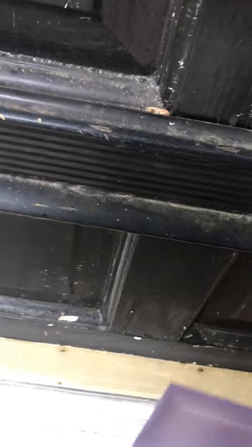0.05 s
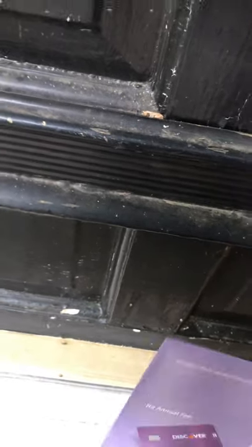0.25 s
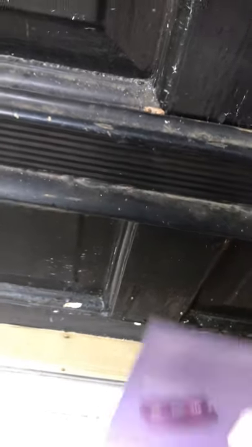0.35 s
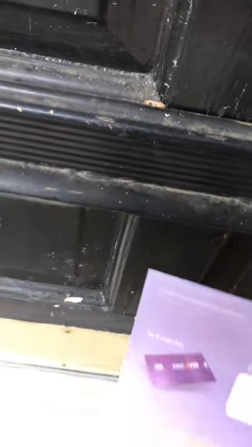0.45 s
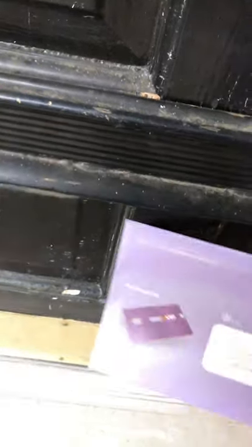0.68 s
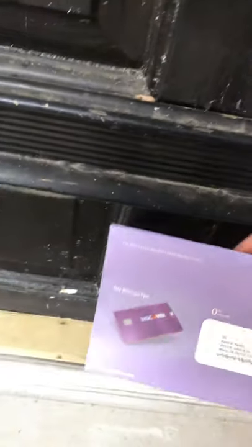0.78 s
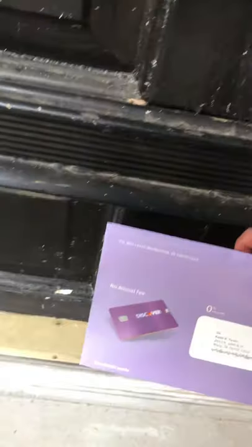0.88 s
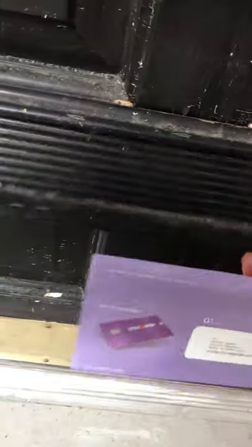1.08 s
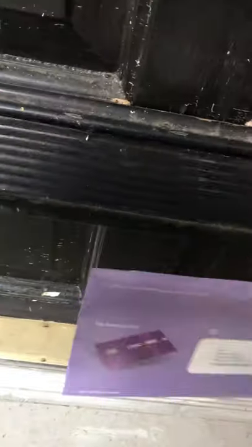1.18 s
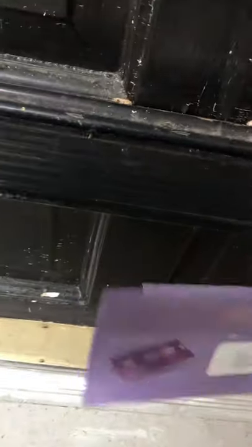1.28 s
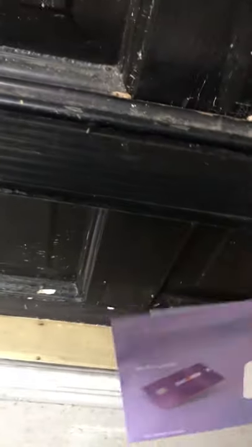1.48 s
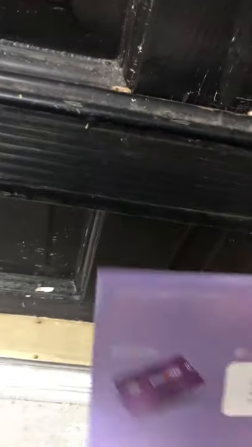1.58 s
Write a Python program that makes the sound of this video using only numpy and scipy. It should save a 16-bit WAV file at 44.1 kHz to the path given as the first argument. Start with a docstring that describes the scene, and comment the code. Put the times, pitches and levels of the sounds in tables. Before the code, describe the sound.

A small dog yaps three times behind a wooden front door, whines briefly and barks once more, softly. Close by on the porch, an envelope scrapes and the metal letter flap rattles over a low, distant hum.

```python
"""A small dog yaps in the hall behind a wooden front door, heard from the porch, microphone by the slot.
Three barks with a grumble before the third, a short whine, then a softer fourth bark: the voice comes
muffled through the door, its thin overtones through the letter slot. Close up, an envelope scrapes,
ticks and bumps the wood, and on the last bark the metal flap rattles and knocks the door panel.
Farther off, a low hum like an idling engine goes on throughout."""
import sys
import numpy as np
from scipy import signal
from scipy.fft import rfft, irfft, next_fast_len
from scipy.io import wavfile
from scipy.ndimage import map_coordinates

SR = 44100
rng = np.random.default_rng(int(sys.argv[2]) if len(sys.argv) > 2 else 0)


def materialize(psi):
    """Save the field psi as 16-bit PCM at rate SR to the path in sys.argv[1].

    A 1-D psi becomes a single channel; in a 2-D psi each row is a channel.
    """
    bounded = np.clip(np.atleast_2d(psi).T, -1, 1)
    quanta = np.round(bounded * 32767).astype(np.int16)
    wavfile.write(sys.argv[1], SR, quanta)


N = 72765

# swell of the hum in the street (time [s], level [dB])
HUM_LEVEL = [(0, -29), (.27, -28), (.55, -32.5), (.85, -30.5), (1.05, -31), (1.28, -27), (1.45, -30.5),
             (1.65, -29.5)]
# tones of the hum (frequency at mid-scene [Hz], level [dB])
HUM_LINES = [(63.9, -2), (102, -9), (127.5, -17), (140.3, -7), (204, -26), (280, -26)]
# outdoor air (frequency [Hz], level [dB])
AIR_TONE = [(20, -35), (45, 4), (90, 14), (160, 5.5), (230, 0), (400, -10), (700, -14.5), (1100, -13),
            (1600, -23), (4000, -34), (8000, -44.5), (15500, -42.5)]

# the dog's six calls, each (time [s], pitch [Hz], level [dB])
BARK_1 = [(0.266, 379.5, -25), (0.274, 400, -17), (0.292, 495, -9.5), (0.302, 570, -11), (0.311, 650, -16),
          (0.317, 675, -6), (0.326, 686, -7), (0.336, 658, -7), (0.358, 597, -11.5), (0.378, 545, -15),
          (0.402, 505, -16), (0.414, 506, -21), (0.43, 482, -24)]
BARK_2 = [(0.464, 400, -23), (0.482, 500, -21), (0.49, 535, -18), (0.5, 510, -16.5), (0.512, 535, -14.5),
          (0.543, 583, -16.5), (0.562, 543, -14), (0.573, 490, -15), (0.581, 435, -11.5), (0.597, 398, -11),
          (0.612, 360, -21), (0.625, 310, -30)]
GRUMBLE = [(.68, 354, -48), (.705, 449.6, -28.5), (.73, 518, -26.5), (.75, 515, -27.5)]
BARK_3 = [(0.768, 387.6, -21), (0.782, 407, -13), (0.798, 504.3, -20.5), (0.816, 559.4, -19.5),
          (0.82, 570.2, -15), (0.83, 539.4, -18.5), (0.836, 514.6, -17.5), (0.85, 377.3, -10.5),
          (0.86, 362.7, -22), (0.87, 355.3, -15.5), (0.893, 324.5, -23.5)]
WHINE = [(1.072, 505, -41), (1.095, 490, -27.5), (1.113, 485, -32.5), (1.14, 482, -28.5), (1.165, 435, -34),
         (1.2, 410, -43)]
BARK_4 = [(1.264, 311.6, -35.5), (1.273, 375.8, -23), (1.283, 446.5, -22.5), (1.297, 469.8, -21),
          (1.315, 538, -23.5), (1.34, 527.4, -26)]
# throat colour: mouth open, half closed, in a whine, in a soft bark (frequency [Hz], level [dB])
YAP = [(300, -20), (430, -15), (580, 4), (800, 0), (1050, -1), (1350, -7), (1480, -24.5), (2200, -38),
       (4000, -65)]
WOOF = [(300, -19.5), (540, -38), (690, 2), (900, -1.5), (1200, 4.5), (1350, -3), (1520, -13),
        (1850, -15.5), (2290, -14), (2600, -26), (3400, -29.5), (7000, -52)]
WHIMPER = [(280, -25), (410, 3), (480, 4), (600, -6), (920, -22), (1450, -13), (2000, -32), (9000, -65)]
SOFT_WOOF = [(300, -9), (540, -14.5), (700, 6), (900, -3), (1200, 0.5), (1520, -11), (2600, -20),
             (7000, -45)]
# voicing of each call (call table, throat colour, fundamental [dB], rasp [dB])
CALLS = [(BARK_1, YAP, -19, -6.5), (BARK_2, YAP, -8.5, -5), (GRUMBLE, YAP, -35.5, -1.1),
         (BARK_3, WOOF, -51, -2.4), (WHINE, WHIMPER, 0, 2.5), (BARK_4, SOFT_WOOF, -23, 0)]
# hoarseness of the voice (time [s], roughness [0 clear to 1 hoarse])
ROUGHNESS = [(.27, .55), (.29, .28), (.32, .1), (.337, .42), (.41, .4), (.47, .22), (.555, .06), (.58, .2),
             (.62, .25), (.68, .55), (.75, .55), (.78, .15), (.815, .65), (.84, .55), (.855, .12),
             (.91, .3), (1.09, .06), (1.2, .14), (1.27, .12), (1.3, .5)]
# thin overtones leaking through the slot (time [s], level [dB])
SQUEAK_LEVEL = [(.265, -63.5), (.297, -40.5), (.335, -36.5), (.395, -40.5), (.415, -69.5), (.48, -54.5),
                (.51, -39), (.565, -40), (.59, -41), (.607, -65), (.78, -65.5), (.835, -46.5), (.86, -68)]
# their broad colour (frequency [Hz], level [dB])
SQUEAK_TONE = [(1060, -32), (1800, 0.5), (2060, -14.5), (2380, 0.5), (2850, -10), (3230, -5.5),
               (3670, -7.5), (4470, -9), (5860, -8), (7270, -12.5), (10300, -19.5), (14000, -14.5),
               (15500, -25.5)]
# resonances of the slot (frequency [Hz], width [Hz], gain [dB])
SLOT_RESONANCES = [(3270, 130, 6), (4450, 260, 1), (5350, 170, 1), (7200, 400, 4)]
# chesty puff opening the first bark (time [s], level [dB], rise [s], t60 [s])
CHEST_PUFF = (.26, -27, .003, .07)
# colour of that puff (frequency [Hz], level [dB])
CHEST_TONE = [(280, -30), (400, 24.5), (750, -18), (1200, -33), (1600, -41), (4000, -65)]
# narrow resonance of the hall (frequency [Hz], width [Hz], gain [dB])
HALL_RESONANCE = (2295, 47, 14)
# reverberation behind the door (frequency [Hz], t60 [s])
HALL_DECAY = [(200, 0.34), (1100, 0.44), (2300, 0.12), (8000, 0.28)]

# envelope sliding, close to the microphone (time [s], level [dB])
SLIDE_LEVEL = [(0, -91), (.55, -64), (.68, -46), (.9, -45), (1.1, -53), (1.38, -43), (1.46, -63.5),
               (1.65, -54.5)]
# paper strokes (time [s], level [dB], rise [s], t60 [s])
STROKES = [(0.948, -42, 0.0028, 0.15), (.975, -55, 0.0032, 0.17), (1.062, -28, 0.026, 0.18),
           (1.156, -46, .002, 0.094), (1.228, -35, 0.021, 0.17), (1.32, -62, 0.011, 0.43),
           (1.504, -49.5, 0.0043, 0.2), (1.631, -42, 0.0078, 0.24)]
# colour of the scraping paper (frequency [Hz], level [dB])
PAPER_TONE = [(300, 10.5), (1500, -4), (2800, -6), (4000, -10), (5500, -8), (7500, -16), (10000, -19.5),
              (15000, -29.5)]
# sharp ticks of the envelope's edge (time [s], level [dB])
TICKS = [(.899, -43.5), (.945, -38), (.974, -49), (0.9792, -44), (0.9902, -41), (0.997, -33), (1.1967, -35)]
# colour of the ticks (frequency [Hz], level [dB])
TICK_TONE = [(500, -8), (1500, -6), (2800, 0), (5800, 0), (7500, -12), (11000, -22), (15000, -32)]
# envelope bumping the door (time [s], level [dB])
BUMPS = [(0.998, -38), (1.159, -32), (1.197, -27), (1.608, -30)]
# colour of the bumps (frequency [Hz], level [dB])
BUMP_TONE = [(80, -5), (280, -1.5), (650, 2), (1500, -10.5), (3000, -12), (8000, -65)]

# contacts of the flap (time [s], level [dB], door thud [dB])
FLAP_CONTACTS = [(1.278, -30, -43), (1.286, -14.5, -23), (1.2898, -20, -40), (1.2956, -13, -30),
                 (1.299, -22, -40), (1.3018, -12, -23), (1.3072, -19, -25), (1.3113, -6.5, -28),
                 (1.6036, -24.5, -46)]
# modes of the metal flap (frequency [Hz], level [dB])
FLAP_MODES = [(2860, -7.5), (5200, -9.5), (5920, -7), (6950, 0), (8700, -9.5)]
# colour of each contact's crack (frequency [Hz], level [dB])
CRACK_TONE = [(300, -0.5), (1200, 3.5), (2800, -3), (4500, -9.5), (6000, -8.5), (7100, -2.5), (7800, -11),
              (8700, -2), (9700, -8), (10500, -20.5), (15500, -27)]
# modes of the door panel (frequency [Hz], level [dB], t60 [s])
PANEL_MODES = [(137, -6, .09), (203, 0, .12), (240, -8, .07), (480, -10, .05), (703, -1, .11),
               (1060, -8, .12)]
# reverberation around the microphone (frequency [Hz], t60 [s])
PORCH_DECAY = [(200, 0.47), (2000, 0.97), (10000, 0.13)]

HUM_DRIFT_PER_S, HUM_WAVER_DB, AIR_DB = 0.0276, 0.8, -39
JITTER, JITTER_HZ, WANDER, WANDER_HZ = 0.04, 201.65, 0.06, 90  # depths: share of pitch at roughness 1
FLUTTER_HZ, CALL_EDGE_S = 196.8, 0.012
OPEN_HZ, OPEN_DB_PER_OCT = 563, 15  # the fundamental fades as the pitch falls below OPEN_HZ
THIRD_HARMONIC_DB, SUBHARMONIC_DB = -24, -5
SQUEAK_HISS_SHARE, SQUEAK_SCATTER, FLICKER_DB, FLICKER_HZ = 0.4, 0.27, 2.5, 130
GRAIN_DB, GRAIN_HZ = 0.5, 487
RING_DB, RING_SCATTER, CRACK_DB = -10.5, 0.017, -9
VOICE_HALL_DB, SQUEAK_HALL_DB, PORCH_DB = -8.5, -7.5, -17.5
TOP_HZ = 15750


def amp(db):
    """Decibels to gain."""
    return 10 ** (np.asarray(db) / 20)


def unit(x):
    """Scale to rms 1."""
    return x / np.sqrt(np.mean(x ** 2) + 1e-20)


def along(points, hz):
    """Interpolate (frequency [Hz], value) points on a log axis."""
    freqs, values = np.transpose(points)
    return np.interp(np.log(hz + 1), np.log(freqs + 1), values)


def clock():
    """Time of each sample in seconds."""
    return np.arange(N) / SR


def curves(rows):
    """One value per sample for each column after the time."""
    times, *columns = np.transpose(rows)
    return [np.interp(clock(), times, column) for column in columns]


def wobble(hz):
    """A smooth random curve with hz knots a second."""
    return map_coordinates(rng.standard_normal(N // 8), [clock() * hz], mode="wrap")


def filtered(x, response):
    """x through a gain given as a function of frequency."""
    size = next_fast_len(N + SR // 2)
    return irfft(rfft(x, size) * response(np.fft.rfftfreq(size, 1 / SR)), size)[:N]


def coloured(x, spectrum):
    """x through a colour (frequency [Hz], level [dB])."""
    return filtered(x, lambda hz: amp(along(spectrum, hz)))


def resonant(x, peaks):
    """x with resonances added."""
    def response(hz):
        return 1 + sum(2j * amp(db) * hz * width / (centre ** 2 - hz ** 2 + 1j * hz * width)
                       for centre, width, db in peaks)
    return filtered(x, response)


def noise(spectrum):
    """Coloured noise of rms 1."""
    return unit(coloured(rng.standard_normal(N), spectrum))


def burst(start, rise, t60):
    """A rise and an exponential decay, times in seconds."""
    age = np.maximum(clock() - start, 0)
    return (1 - np.exp(-age / rise)) * np.exp(-np.log(1000) * age / t60)


def ring(start, hz, t60):
    """One struck mode."""
    return burst(start, 0.00033, t60) * np.sin(2 * np.pi * hz * (clock() - start))


def echo(x, decay):
    """A diffuse tail in which each frequency dies at its own speed."""
    hz, t, bands = signal.stft(rng.standard_normal(SR // 2), SR, nperseg=256)
    fade = np.exp(-np.log(1000) * t / along(decay, hz)[:, None])
    _, tail = signal.istft(bands * fade, SR, nperseg=256)
    return signal.fftconvolve(x, tail / np.linalg.norm(tail))[:N]


def street():
    """Beyond the porch: a low idling hum wavers and slowly speeds up over outdoor air."""
    level_db, = curves(HUM_LEVEL)
    speed = 1 + HUM_DRIFT_PER_S * (clock() - clock().mean())
    turn = 2 * np.pi * np.cumsum(speed) / SR
    hum = sum(amp(db + HUM_WAVER_DB * wobble(hz=6.15)) * np.sin(hz * turn + rng.uniform(0, 2 * np.pi))
              for hz, db in HUM_LINES)
    return np.sqrt(2) * amp(level_db) * hum + amp(AIR_DB) * noise(AIR_TONE)


def voice_partial(order, phase, rough):
    """One partial of the dog's voice; its level flutters more as the voice gets hoarse."""
    wave = np.sqrt(2) * np.sin(order * phase + rng.uniform(0, 2 * np.pi))
    return wave * (1 + rough * wobble(FLUTTER_HZ))


def throat_tone(pitch, phase, rough, fundamental_db):
    """The second harmonic and its weaker neighbours, with half orders in rough stretches."""
    opening_db = OPEN_DB_PER_OCT * np.minimum(np.log2(pitch / OPEN_HZ), 0)
    tone = voice_partial(2, phase, rough)
    tone += amp(fundamental_db + opening_db) * voice_partial(1, phase, rough)
    tone += amp(THIRD_HARMONIC_DB) * voice_partial(3, phase, rough)
    half_orders = voice_partial(1.5, phase, rough) + voice_partial(2.5, phase, rough)
    return tone + amp(SUBHARMONIC_DB) * rough * half_orders


def slot_squeak(pitch, rough, breath):
    """Thin overtones and breath pass the letter slot, ring its resonances and flicker."""
    phase = 2 * np.pi * np.cumsum(pitch) / SR + SQUEAK_SCATTER * np.sqrt(rough) * wobble(FLUTTER_HZ)
    buzz = unit(sum(voice_partial(order, phase, rough) for order in range(3, 27)))
    source = np.sqrt(1 - SQUEAK_HISS_SHARE) * buzz + np.sqrt(SQUEAK_HISS_SHARE) * breath
    leak = resonant(coloured(source, SQUEAK_TONE), SLOT_RESONANCES)
    return unit(leak * amp(FLICKER_DB * wobble(FLICKER_HZ)))


def dog_call(contour, throat, fundamental_db, rasp_db):
    """One call as (voice, squeak): a muffled, jittering tone breaking into rasp, and its overtones."""
    pitch, level_db = curves(contour)
    rough, = curves(ROUGHNESS)
    squeak_db, = curves(SQUEAK_LEVEL)
    fade_in = np.clip((clock() - contour[0][0]) / CALL_EDGE_S + 1, 0, 1)
    fade_out = np.clip((contour[-1][0] - clock()) / CALL_EDGE_S + 1, 0, 1)
    gate = fade_in * fade_out
    waver = JITTER * wobble(JITTER_HZ) + WANDER * wobble(WANDER_HZ)
    phase = 2 * np.pi * np.cumsum(pitch * (1 + rough * waver)) / SR
    tone = coloured(throat_tone(pitch, phase, rough, fundamental_db), throat)
    breath = unit((1 + np.cos(phase)) * rng.standard_normal(N))  # one pulse of air per cycle
    rasp = amp(rasp_db) * unit(coloured(breath, throat))
    voice = np.sqrt(1 - rough) * tone + np.sqrt(rough) * rasp
    return gate * amp(level_db) * voice, gate * amp(squeak_db) * slot_squeak(pitch, rough, breath)


def dog():
    """Behind the door: the calls, opened by a chesty puff, ring in the hall."""
    voice, squeak = np.sum([dog_call(*row) for row in CALLS], axis=0)
    start, db, rise, t60 = CHEST_PUFF
    voice += amp(db) * burst(start, rise, t60) * noise(CHEST_TONE)
    voice_tail = amp(VOICE_HALL_DB) * echo(resonant(voice, [HALL_RESONANCE]), HALL_DECAY)
    squeak_tail = amp(SQUEAK_HALL_DB) * echo(squeak, HALL_DECAY)
    return voice + voice_tail + squeak + squeak_tail


def paper():
    """Close up: the envelope slides, catches and ticks in the slot, and bumps the wood."""
    slide_db, = curves(SLIDE_LEVEL)
    strokes = sum(amp(db) * burst(start, rise, t60) for start, db, rise, t60 in STROKES)
    ticks = sum(amp(db) * burst(start, rise=0.0003, t60=0.045) for start, db in TICKS)
    bumps = sum(amp(db) * burst(start, rise=0.0016, t60=0.11) for start, db in BUMPS)
    scrape = unit(noise(PAPER_TONE) * amp(GRAIN_DB * wobble(GRAIN_HZ)))
    return (amp(slide_db) + strokes) * scrape + ticks * noise(TICK_TONE) + bumps * noise(BUMP_TONE)


def flap():
    """Close up: each contact cracks, briefly rings the metal and thuds the door panel."""
    out = np.zeros(N)
    for start, db, thud_db in FLAP_CONTACTS:
        metal = np.zeros(N)
        for hz, mode_db in FLAP_MODES:  # the flap rings a little differently at each contact
            gain = amp(mode_db + rng.normal(0, 0.74))
            detune = 1 + RING_SCATTER * rng.standard_normal()
            metal += gain * ring(start, hz * detune, t60=0.022)
        crack = burst(start, rise=0.00055, t60=0.024) * noise(CRACK_TONE)
        thud = sum(amp(mode_db) * ring(start, hz, t60) for hz, mode_db, t60 in PANEL_MODES)
        out += amp(db) * (amp(RING_DB) * metal + amp(CRACK_DB) * crack) + amp(thud_db) * thud
    return out


def scene():
    """One microphone on the porch: flap and paper near, the dog indoors, the street behind."""
    near = flap() + paper()
    return (dog() + near + amp(PORCH_DB) * echo(near, PORCH_DECAY) + street())[None]


def record(dry):
    """The recorder keeps nothing above its band limit."""
    return filtered(dry[0], lambda hz: hz < TOP_HZ)[None]


dry = scene()
out = record(dry)
materialize(out)
```